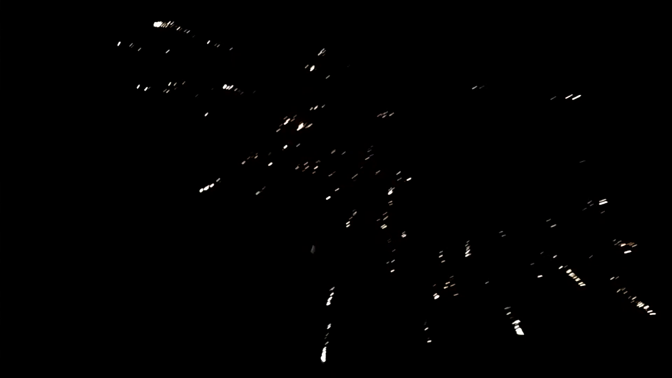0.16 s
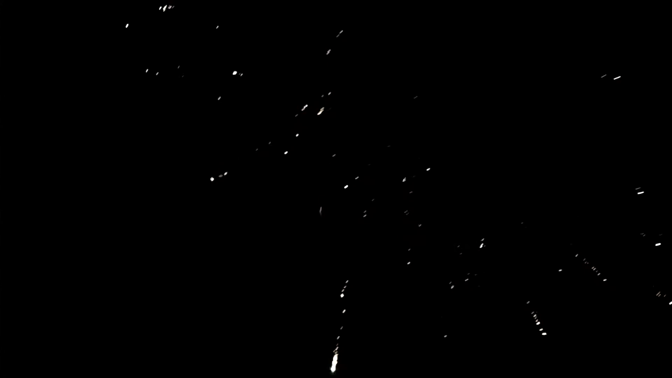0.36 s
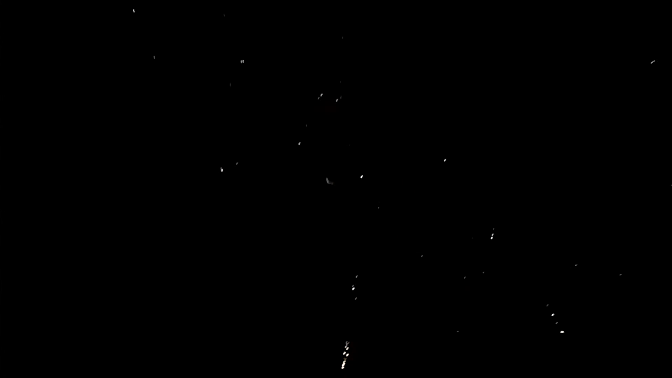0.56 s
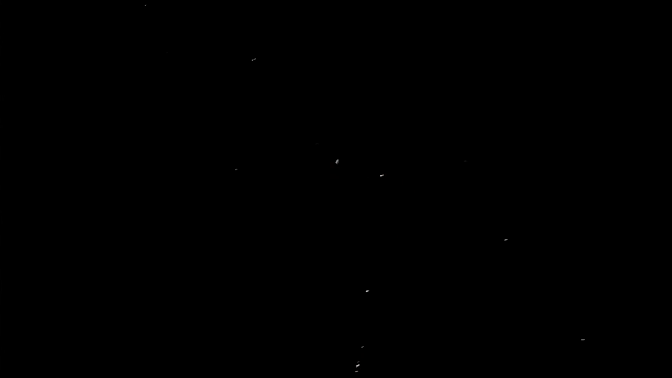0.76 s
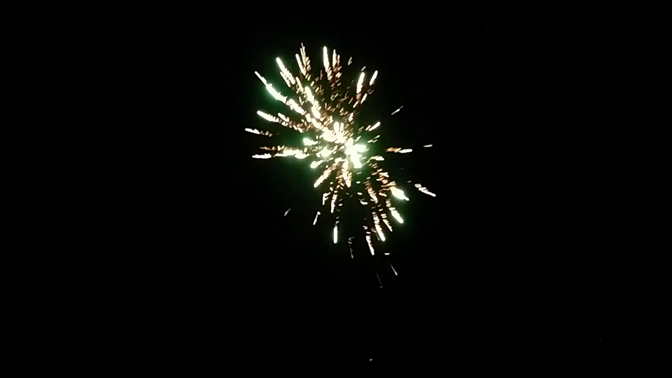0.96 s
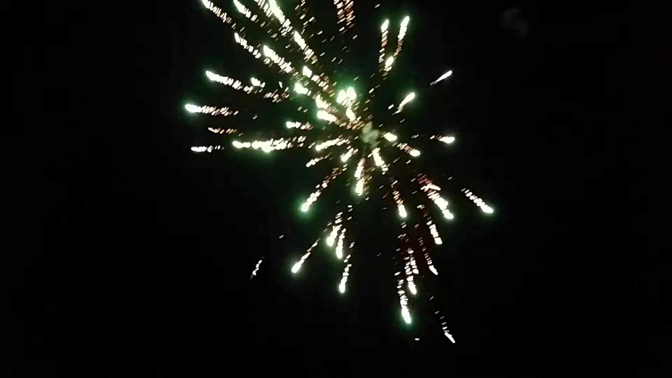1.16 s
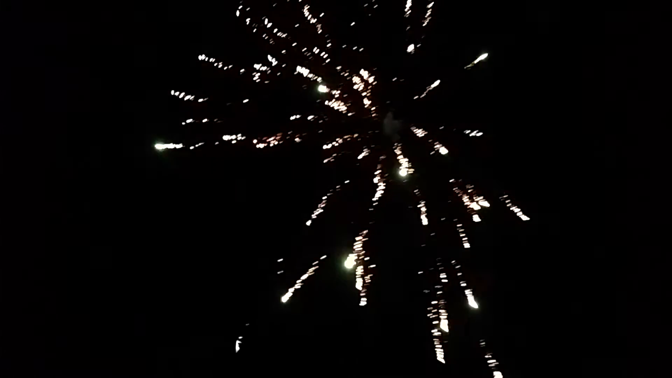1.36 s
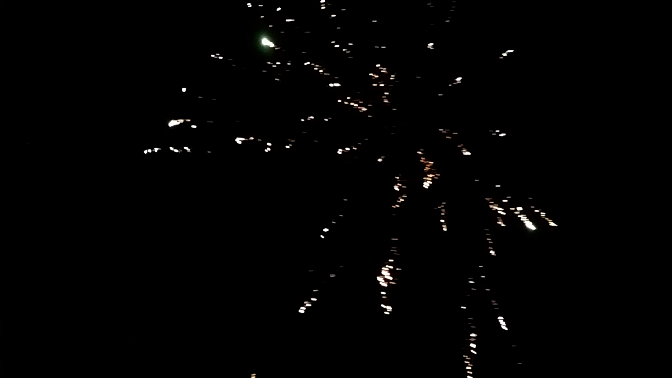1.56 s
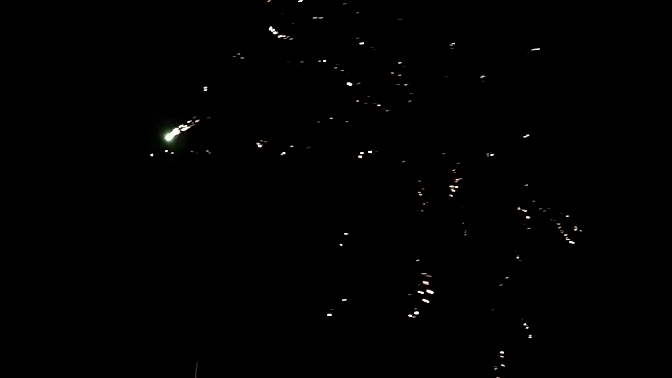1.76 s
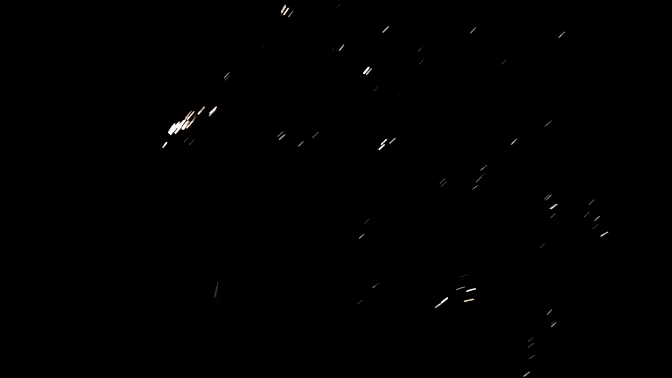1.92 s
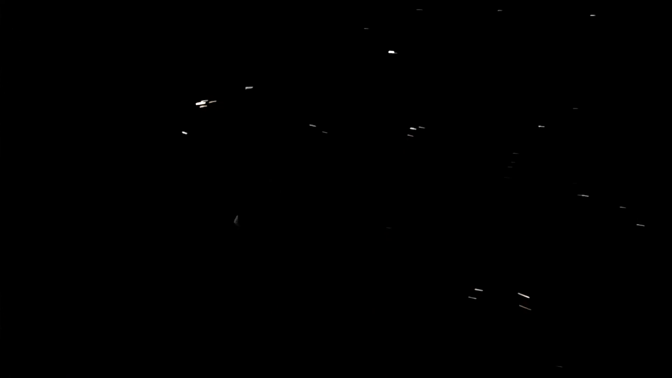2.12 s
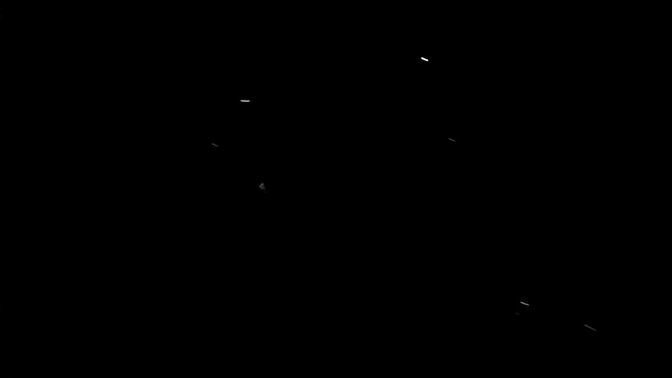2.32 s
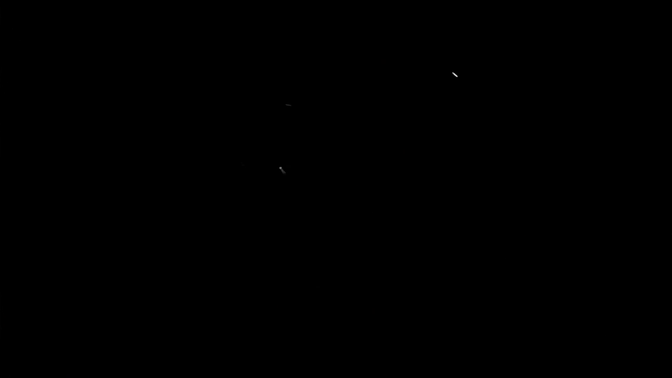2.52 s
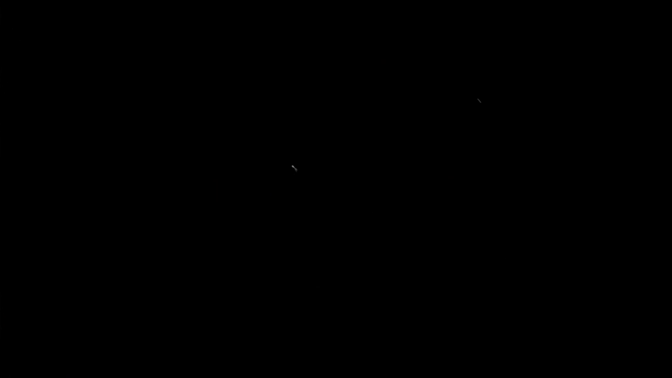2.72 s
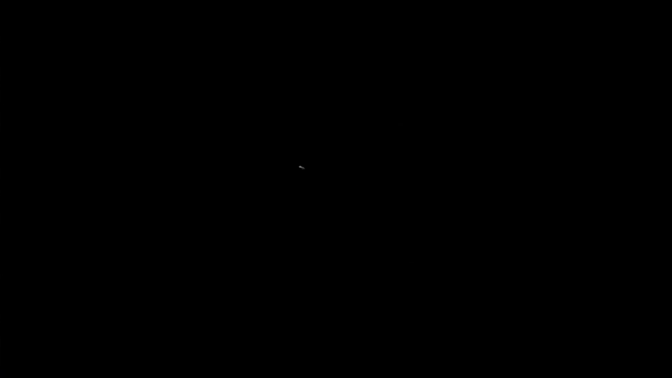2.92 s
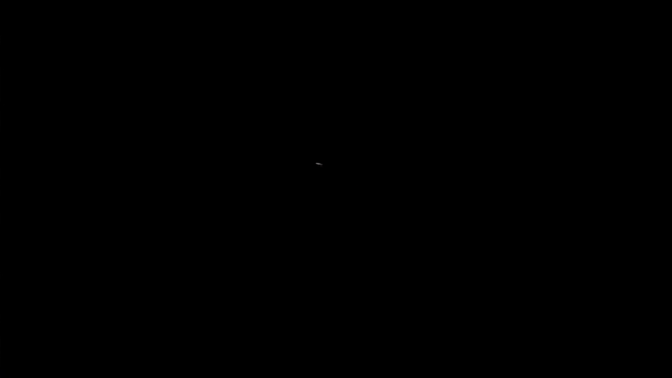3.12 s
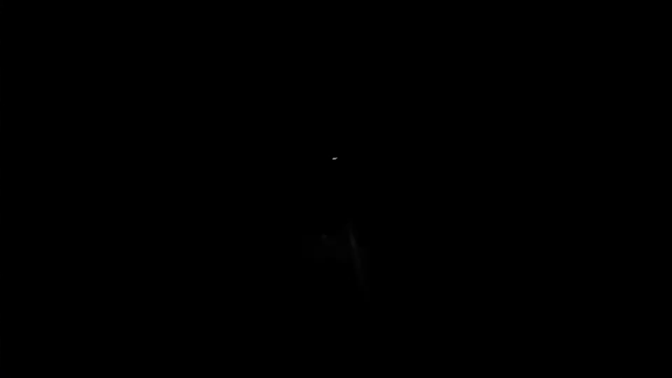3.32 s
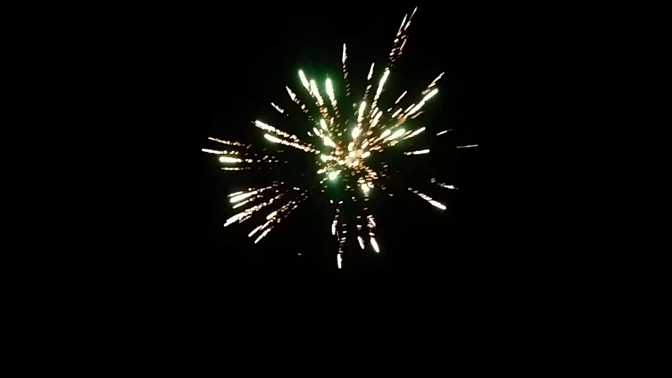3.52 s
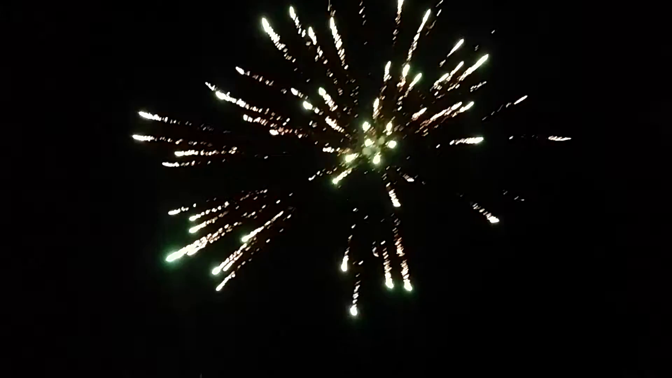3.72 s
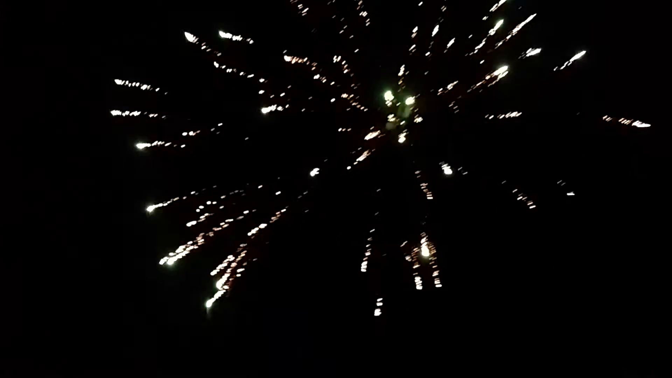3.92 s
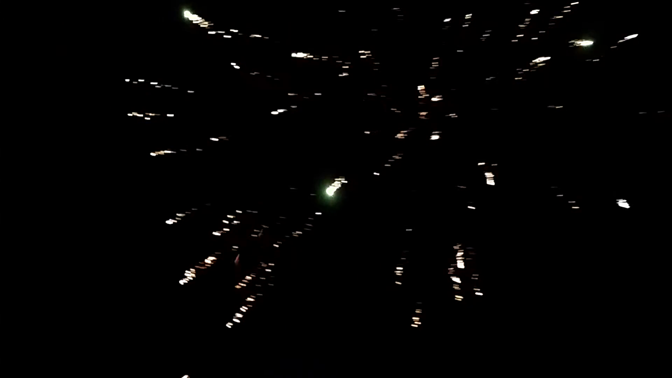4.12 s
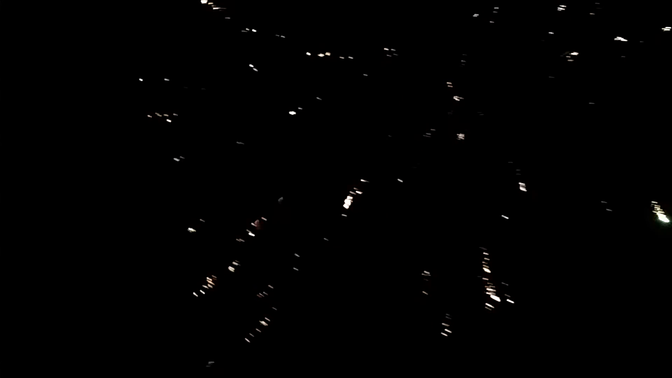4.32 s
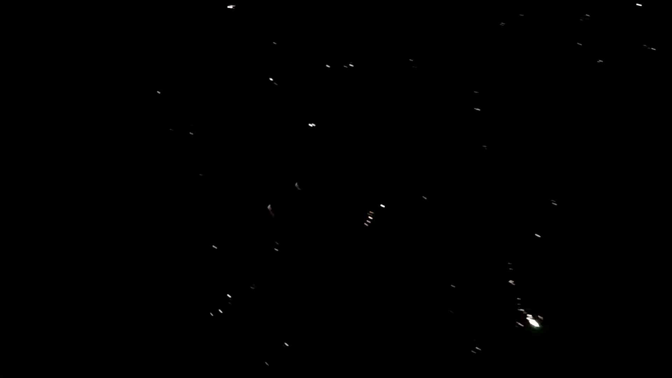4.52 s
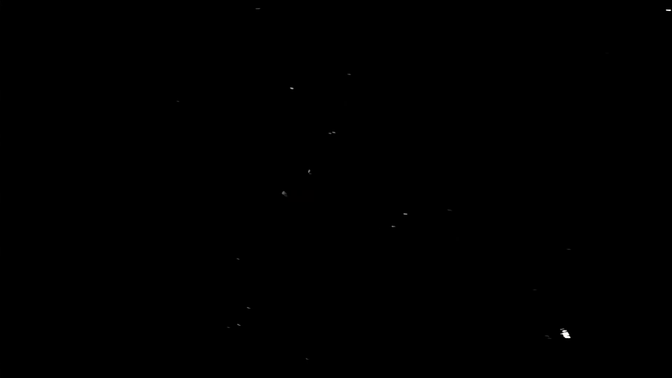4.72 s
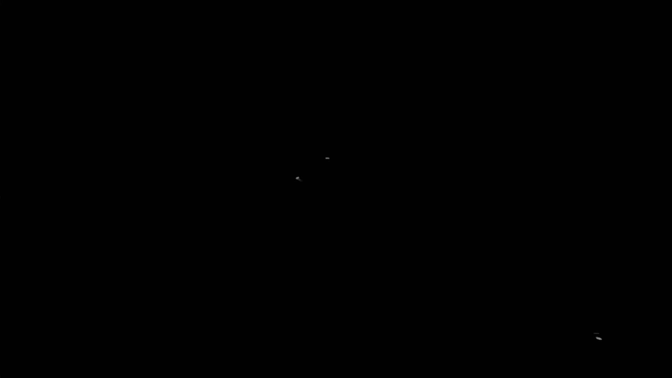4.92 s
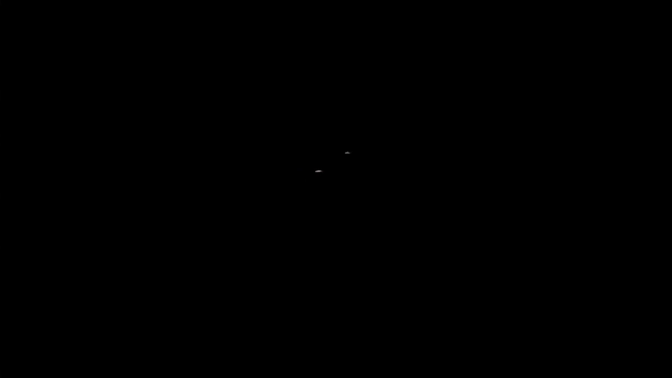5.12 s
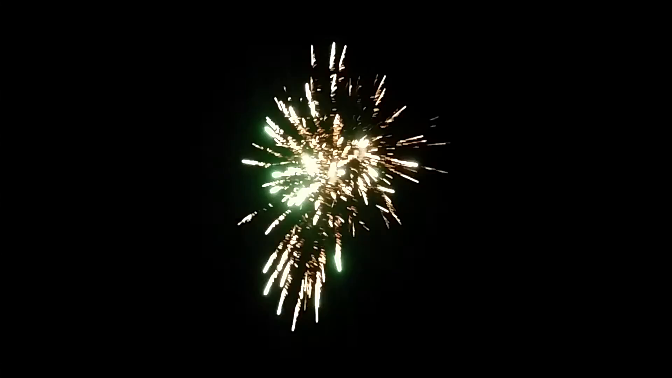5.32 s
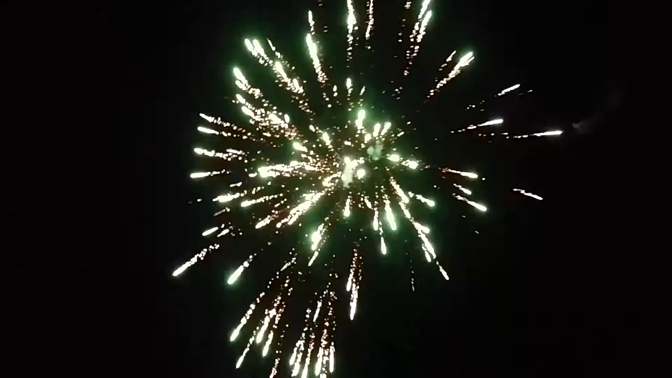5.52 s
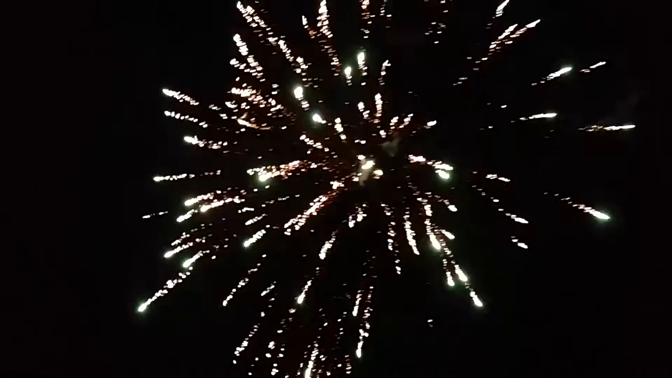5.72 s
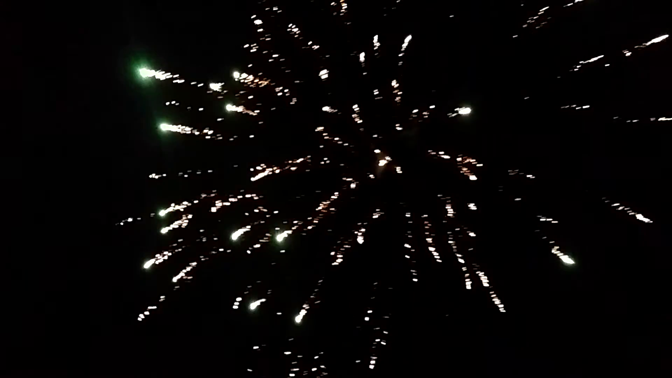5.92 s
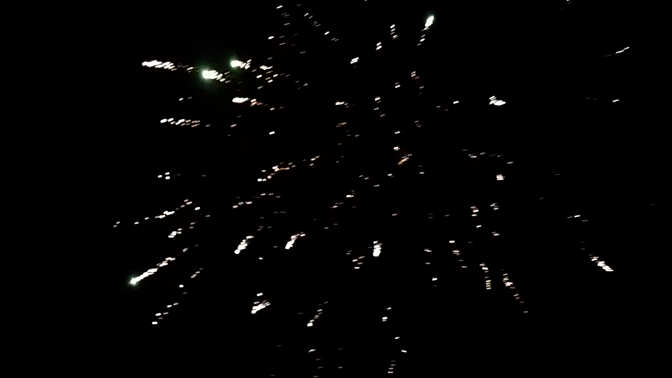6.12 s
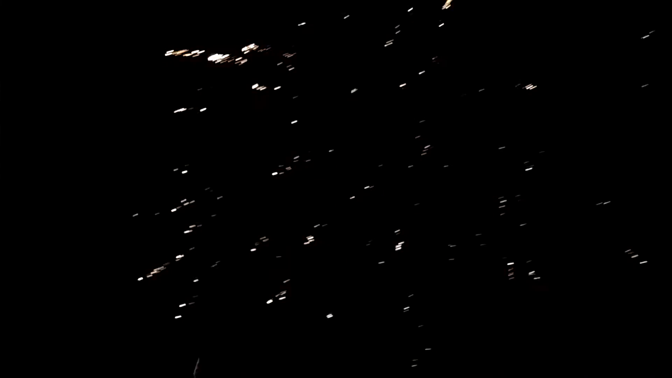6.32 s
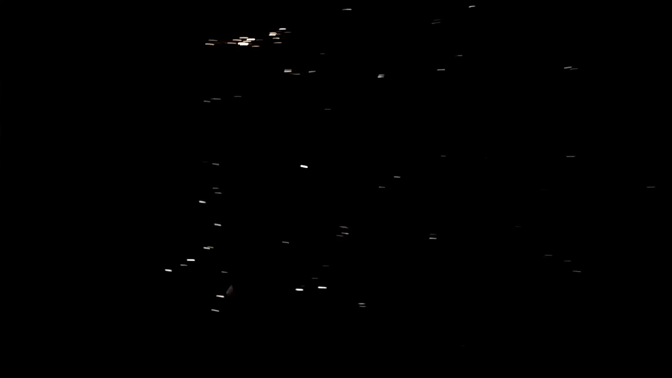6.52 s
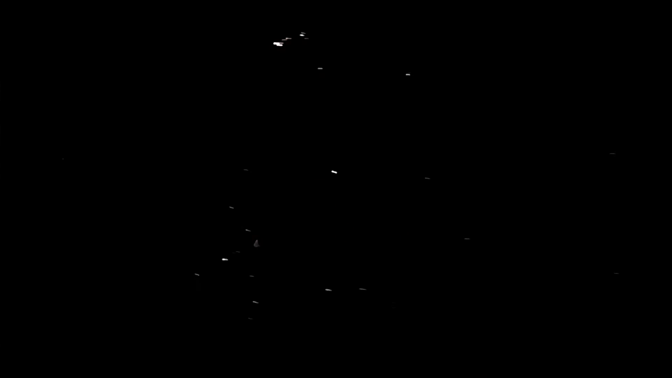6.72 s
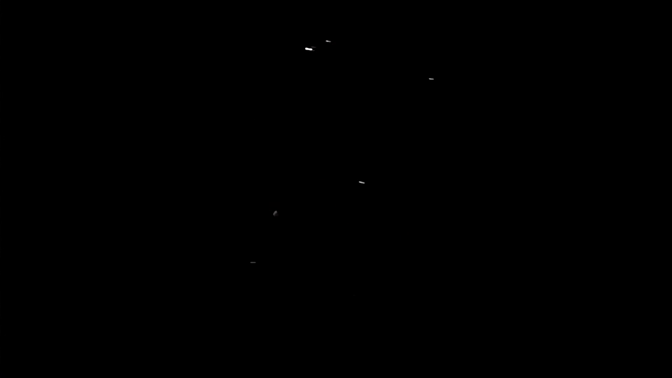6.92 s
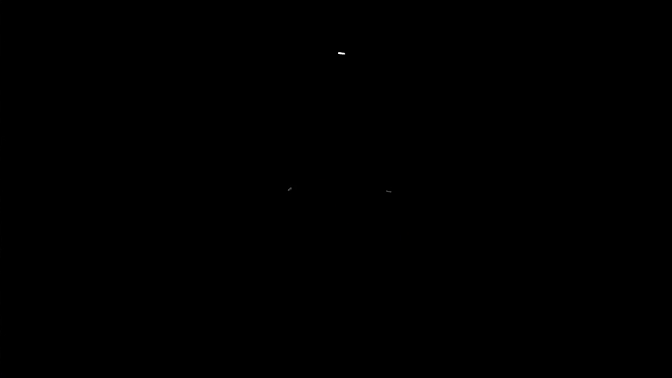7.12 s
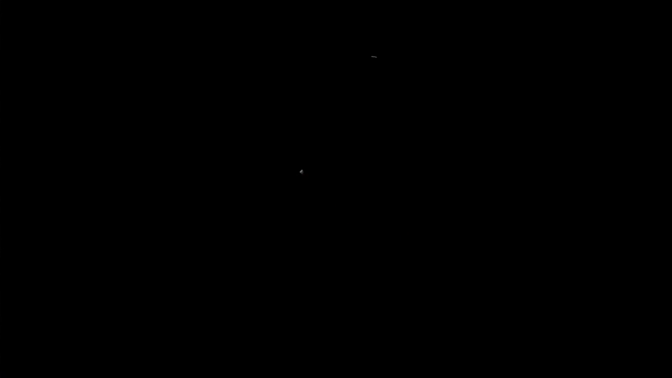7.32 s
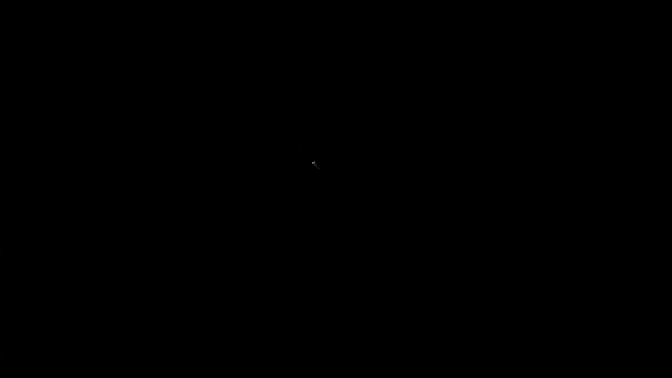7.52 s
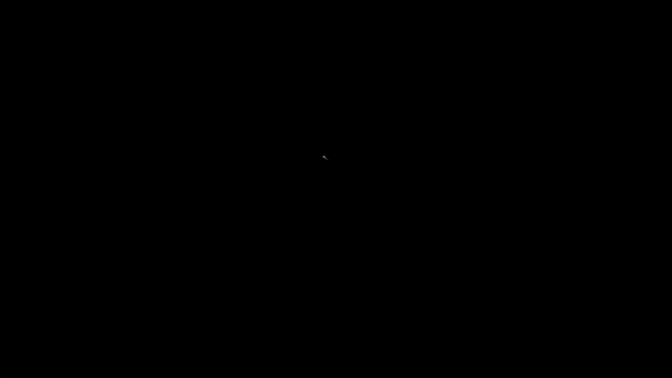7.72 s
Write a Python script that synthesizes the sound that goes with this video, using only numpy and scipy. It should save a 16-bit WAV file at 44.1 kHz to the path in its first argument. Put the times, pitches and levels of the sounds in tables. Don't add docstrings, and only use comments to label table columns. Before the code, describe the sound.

Firework shells crack sharply overhead at night, tubes thump between them, echoes scatter off houses, and wind buffets the phone's microphones.

```python
import sys
import numpy as np
from scipy import signal
from scipy.fft import rfft, irfft, next_fast_len
from scipy.io import wavfile
from scipy.ndimage import uniform_filter1d

SR = 44100
rng = np.random.default_rng(int(sys.argv[2]) if len(sys.argv) > 2 else 0)


def store_wav(level_fs):
    pcm = np.round(np.clip(np.atleast_2d(level_fs), -1, 1) * 32767)
    wavfile.write(sys.argv[1], SR, pcm.T.astype(np.int16))


def ratio(d):
    e = np.asarray(d, float) / 20
    return 10 ** e


N = 342216
TIME = np.arange(N) / SR
BANDS_HZ = 30 * 2 ** np.arange(0, 9.2, 1 / 3)

# (time [s], blast [dB], boom and close reflections [dB], ground echo [dB], tail [dB])
BURSTS = [
    (1.0083, 14, 1, 2, -7.5),
    (3.5655, 15.5, 1, 4, -12),
    (5.3725, 15, -0.5, 2.5, -11),
    (5.4449, 15.5, -6, 1.5, -8.5),
]
LIFTS = [
    (1.3758, 15, -5, -8.5, -17.5),
    (3.3167, 7, -2, -9.5, -19.5),
    (3.3783, 9.4, -0.5, -14.5, -14.5),
    (5.8504, 12.9, -1.5, -14, -19),
]
# (ring [Hz], ring
# [dB], crack [dB])
BURST_VOICES = [(8200, 3.5, -8), (8300, -1, -14), (8300, 1.5, -7.5), (8264, -1.5, -7.5)]
TUBE_VOICES = [(4400, -17, -25), (4700, -20, -14), (5480, -20, -15.5), (5400, -14, -15.5)]
# (time [s], level [dB])
CLIMBS = [(1.414, -54.5), (3.325, -59), (3.385, -50.5), (5.3, -52), (3.7, -58)]
# (frequency [Hz], density [dB per Hz])
CLIMB_SPECTRUM = [(200, -60), (2500, -7), (4500, 0), (9000, 0.5), (13000, -4), (15500, -9)]

# (frequency [Hz], density [dB per Hz])
BURST_SCATTER = [(24, -48), (40, -16), (204, 1), (500, -0.5), (1150, -13.5), (2300, -15), (3300, -21.5),
                 (4700, -21.5), (8550, -32), (14500, -30.5), (16000, -54)]
LIFT_SCATTER = [(60, -20), (300, 6), (700, -2.5), (1500, -10.5), (3000, -25), (6000, -38.5), (14000, -39)]
# (frequency [Hz], near t60 [s], far t60 [s], far share [dB])
SCATTER_DECAY = [(60, 0.38, 0.52, -28.5), (270, 0.17, 0.87, -8.5), (1000, 0.49, 1.2, -11.5),
                 (2280, .6, 1.6, -10), (3880, 0.74, 1.6, -14), (8000, 0.21, 0.88, -10),
                 (13600, 0.061, 0.29, -1)]
# (frequency [Hz], level against the scatter [dB])
FRONTS_SPECTRUM = [(150, -10), (600, -3), (2200, 4), (5000, -7)]
FRONTS_LATE_S, FRONTS_T60_S = 0.021, 0.2
# (delay [s], level against the house fronts [dB])
FAR_WALLS = [(.07, -12.5), (.105, -13), (0.129, -13), (0.161, -15.5), (.2, -13.5), (0.271, -20)]
FAR_WALL_T60_S = 0.087

# (time [s], level [dB], length [ms])
EDDIES_LEFT = [(.207, -30.5, 22), (.496, -18.5, 43), (.619, -18, 27), (.648, -19, 37), (1.566, -28.5, 170),
               (1.905, -23, 31), (2.062, -23.5, 5.4), (2.316, -30, 12.2), (2.43, -29.5, 26),
               (2.538, -23, 15), (3.04, -19, 52), (3.234, -15.5, 33), (3.282, -19, 2.8), (3.517, -21.5, 22),
               (3.843, -16, 51), (3.971, -11, 27), (4.012, -18, 11), (4.041, -22, 53), (4.262, -5, 29),
               (4.812, -16.5, 49), (4.845, -13, 26), (4.987, -13.5, 14), (5.054, -15.5, 50),
               (5.103, -18, 19), (5.146, -17, 40), (5.283, -19.5, 15), (5.341, -16, 7.7), (6.013, -22, 30),
               (6.134, -23, 23), (6.226, -20, 17)]
EDDIES_RIGHT = [(.46, -24, 5.7), (.652, -33, 13), (.872, -15, 39), (.947, -31, 5.4), (1.909, -27, 66),
                (2.391, -31, 17), (2.495, -33.5, 14), (2.536, -21.5, 10), (2.65, -29, 30), (2.813, -32, 19),
                (3.169, -35, 13), (3.272, -24, 58), (3.435, -19.5, 32), (3.875, -26, 28),
                (3.921, -16.5, 28), (3.957, -29, 29), (4.182, -27, 18), (4.408, -14, 13), (4.436, -17, 13),
                (4.565, -22, 28), (4.606, -12.5, 91), (4.678, -13, 29), (4.938, -29, 44), (5.268, -31, 80),
                (6.533, -35.5, 17), (.599, -41, 14), (6.2, -30, 40), (2.03, -41, 30)]
# (time [s], snap peak [dB], eddy [dB], length [ms])
TORN_EDDIES = [(1.824, -43, -12.5, 11.7), (1.868, -42, -13, 14.3), (2.184, -45, -12.5, 21.8),
               (2.222, -41.5, -18, 7.3), (3.19, -22, -16, 18), (3.868, -29.5, -25, 45),
               (4.164, -35.5, -14, 12.3), (4.208, -36.5, -8, 49), (4.329, -32.5, -16, 5.2),
               (4.568, -34, -8.5, 22), (4.612, -36, -8.5, 30.4), (4.78, -29, -15.5, 8.3),
               (4.872, -35, -17, 23.6), (5.311, -20.5, -10, 13.2)]
# (time [s], left [dB], right [dB])
BREEZE = [(0, -33, -53), (.25, -51.5, -55), (1.499, -53, -53), (2.3, -43, -58), (2.8, -57.5, -55),
          (3.1, -33, -34), (3.8, -25.5, -40.5), (4.4, -35.5, -44), (5, -32.5, -44), (5.6, -30.5, -38),
          (6.2, -35.5, -47.5), (6.5, -63.5, -81.5), (7.76, -74, -58)]
# (time [s], peak [dB], centre [Hz], left minus right [dB])
TICKS = [(3.955, -28, 910, 28), (3.955, -34.5, 1800, 20), (4.254, -44, 1200, 22), (4.264, -43, 1200, 22),
         (4.8, -42, 810, 22), (6.226, -45, 510, 18), (4.676, -36, 510, -34.5)]
KICKS_EARLY = [(0.436, -43, 143, 17), (0.462, -28.5, 159, 22.0), (0.536, -33, 223, 17),
               (0.611, -29, 143, 29.0), (0.612, -24, 169, 24.5), (0.853, -28, 143, -32.5),
               (0.852, -18, 143, -28), (0.94, -37, 148, -16)]
KICKS_SECOND = [(1.56, -44, 140, 8.5), (1.821, -25.5, 240, 25), (1.866, -23.5, 144, 28),
                (2.006, -49, 143, 8.0), (2.055, -46.5, 143, 18.5), (2.187, -48, 320, 24.5),
                (2.188, -36, 143, 29.0), (2.219, -32.5, 168, 25.0), (2.31, -42, 148, 11),
                (2.51, -37, 205, 16.0), (2.52, -22, 164, 11), (2.585, -44, 191, 1.5), (2.633, -32, 159, 3),
                (3.024, -25, 175, 19.5), (3.068, -20, 149, 17), (3.152, -32, 145, 3), (3.189, -15, 140, 21),
                (3.26, -32, 218, 10)]
KICKS_THIRD = [(3.821, -23.5, 266, 15), (3.955, -26.5, 175, 21), (4.037, -27, 156, 22.5),
               (4.162, -19.5, 161, 21.5), (4.22, -23, 237, 28.0), (4.251, -38, 175, 29.5),
               (4.324, -26, 272, 23), (4.391, -29, 143, -6.0), (4.429, -32, 143, -16), (4.503, -32, 161, 7),
               (4.567, -26, 240, 1), (4.669, -24, 143, -2), (4.777, -39, 143, 24.0), (4.839, -14, 170, 26),
               (4.975, -20.5, 143, 20.5), (4.98, -18.5, 178, 28), (5.043, -17, 178, 26.0),
               (5.131, -20, 164, 25.5), (5.17, -17, 167, 22.0), (5.277, -18, 250, 19),
               (5.309, -14, 218, 34)]
KICKS_LATE = [(5.944, -41, 213, 7.0), (5.985, -39, 183, 17), (6.094, -50.5, 151, 9.7),
              (6.126, -41, 186, 16.0), (6.179, -37.5, 167, 15.5), (6.218, -41, 171, 18),
              (6.279, -40, 202, 11)]
KICK_DB = -8
SNAP_HZ, SNAP_PAN_DB, SNAP_LEAD = 445, 34, 0.4
SNAP_EDGE_HZ, SNAP_EDGE_DB = 840, -10
LEFT_EDDY_HZ, RIGHT_EDDY_HZ, TORN_EDDY_HZ = 140, 116, 157
HZ_PER_LENGTH, HZ_SCATTER = -0.03, 0.091
FLUTTER_DB, TORN_FLUTTER_DB = -19, -10.5
SMALL_EDDIES, SMALL_OVER_BREEZE_DB, SMALL_SCATTER_DB, SMALL_MS = 70, 8, 3.5, 21

# (frequency [Hz], density [dB per Hz])
TOWN_SPECTRUM = [(20, -40.5), (35, -13.5), (75, 0.5), (150, -10), (200, -10), (430, -12), (540, -11.5),
                 (680, -10), (1040, -20.5), (2200, -17), (3300, -36), (4800, -36.5), (7000, -47),
                 (15500, -46)]
TOWN_DB = -43.5
# (time [s], level [dB])
TRAFFIC = [(0, -2.5), (.8, 0.5), (2.6, -4.5), (4.6, 0.5), (5.2, -1), (6.8, -0.5), (7.2, -1.5), (7.76, -3.5)]
# (frequency [Hz], common share [0-1])
LIKENESS = [(60, 1), (300, .9), (700, 0.8), (1100, 0.086), (2000, 0.99), (3200, 0.054), (8000, 0.2)]
# (frequency [Hz], level against the right port [dB])
LEFT_PORT = [(60, 0.5), (700, -3.5), (2400, -4.5), (4400, 0), (8200, 7), (15000, 1.5)]
PORT_LAG = 5
AIR_EDGE = signal.ellip(8, .2, 45, 15500, fs=SR, output="sos")

OPEN_DB, DUCK_DB, RELEASE_S, RELEASE_BEND = 1.89, -14, 0.37, 2.2
BURST_ATTACK_S, BURST_HOLD_S = 0.052, 0.98
LIFT_ATTACK_S, LIFT_HOLD_S = 0.11, 0.72
EARLIER_BANG_S = -0.71


def scene():
    air = bursts() + lifts() + signal.sosfilt(AIR_EDGE, surroundings())
    hz = np.maximum(np.arange(N // 2 + 1) * SR / N, 1)
    air[0] = irfft(rfft(air[0]) * ratio(on_log(hz, LEFT_PORT)), N)
    return air + gusts() + snaps() / ratio(gain_db())


def bursts():
    return bangs(BURSTS, BURST_VOICES, echo_ms=8.6, front=(.33, .52, 3.4), boom=(105.5, -13.5, 4.0, 0.47),
                 ring_ms=0.087, right_db=(-24, -4), crack_ms=0.77, ground_hz=2600,
                 clatter=(1.5, 22, 450), width=2)


def lifts():
    return bangs(LIFTS, TUBE_VOICES, echo_ms=0.94, front=(.42, .62, 2.1), boom=(198, -1.5, 2.0, -0.47),
                 ring_ms=0.84, right_db=(-7, -4), crack_ms=0.76, ground_hz=2000,
                 clatter=(-17, 7.3, 400), width=11)


def bangs(shots, voices, echo_ms, front, boom, ring_ms, right_db, crack_ms, ground_hz, clatter, width):
    out, age = np.zeros((2, N)), np.arange(400) / SR
    clatter_db, clatter_ms, clatter_hz = clatter
    boom_hz, boom_db, boom_ms, boom_turn = boom
    smear = np.ones(width) / width
    ground = signal.butter(1, ground_hz, fs=SR, output="sos")
    thin = signal.butter(2, clatter_hz, "highpass", fs=SR, output="sos")
    ragged = signal.butter(2, [3200, 12500], "bandpass", fs=SR, output="sos")
    for (s, db, body_db, echo_db, _), (ring_hz, ring_db, crack_db) in zip(shots, voices):
        ring = np.sin(2 * np.pi * ring_hz * age) * np.exp(-age / (ring_ms / 1000))
        for port in range(2):
            paths = np.zeros(1500)
            near = (40 + rng.random(24) * clatter_ms * SR / 1000).astype(int)
            fade = np.exp(-near / (0.22 * clatter_ms * SR / 1000))
            paths[near] = ratio(clatter_db + body_db) * rng.uniform(-1.9, 1, 24) * fade
            paths = signal.sosfilt(thin, paths)
            paths[int(echo_ms * SR / 1000)] += ratio(echo_db)
            paths = signal.sosfilt(ground, paths)
            paths[0] += 1
            port_boom_db = boom_db + body_db - 3 * (1 - port)
            source = blast(*front, boom_hz, port_boom_db, boom_ms, boom_turn)
            wave = np.convolve(smear, np.convolve(paths, source))
            crack = signal.sosfilt(ragged, rng.standard_normal(400)) * np.exp(-age / (crack_ms / 1000))
            wave[:400] += ratio(ring_db + right_db[0] * port) * ring
            wave[:400] += ratio(crack_db + right_db[1] * port) * crack
            at = int(s * SR) + port * PORT_LAG // 2
            out[port, at:at + len(wave)] += ratio(db) * wave
    return out


def blast(phase_ms, bend, swings, boom_hz, boom_db, boom_ms, boom_turn):
    age = np.arange(1800) / SR
    u = age / (phase_ms / 1000)
    shock = np.sin(np.pi * u ** bend) * np.exp(-u / swings)
    boom = np.sin(2 * np.pi * (boom_hz * age + boom_turn)) * np.exp(-age / (boom_ms / 1000))
    return shock + ratio(boom_db) * boom * (1 - np.exp(-u))


def surroundings():
    walls = walk(45)
    swell = 1.2 * walk(1.8) + np.interp(TIME, *np.transpose(TRAFFIC))
    fronts = wall_echoes()
    climbs = fading(CLIMBS, 1.8, 0.04)
    out = 0
    for hz, noise in diffuse_bands():
        patches = ratio(3 * walls + 3 * walk(25))
        power = scatter(hz, fronts) * patches
        power += climbs * share(hz, CLIMB_SPECTRUM)
        power += ratio(2 * (TOWN_DB + swell + walk(6))) * share(hz, TOWN_SPECTRUM)
        out = out + noise * np.sqrt(power)
    return out


def scatter(hz, fronts):
    near_t60, far_t60, far_db = (on_log(hz, SCATTER_DECAY, column=c) for c in (1, 2, 3))
    burst = fading(BURSTS, near_t60, 0.023) + ratio(2 * far_db) * fading(BURSTS, far_t60, 0.032)
    burst += ratio(2 * on_log(hz, FRONTS_SPECTRUM)) * fronts
    lift = fading(LIFTS, 0.25 * near_t60, 0.0011)
    lift += ratio(2 * (far_db + 1.5)) * fading(LIFTS, 0.26 * far_t60, 0.0076)
    return burst * share(hz, BURST_SCATTER) + lift * share(hz, LIFT_SCATTER)


def wall_echoes():
    near = [(s + FRONTS_LATE_S, tail_db) for s, *_, tail_db in BURSTS]
    far = [(s + late_s, tail_db + db) for s, *_, tail_db in BURSTS for late_s, db in FAR_WALLS]
    return fading(near, FRONTS_T60_S, 0.0062) + fading(far, FAR_WALL_T60_S, 0.0025)


def fading(shots, t60, build_s):
    power, age = np.zeros(N + 2 * SR), TIME[:2 * SR]
    shape = (1 - np.exp(-age / build_s)) * np.exp(-2 * np.log(1000) * age / t60)
    for s, *_, tail_db in shots:
        at = int(s * SR)
        power[at:at + 2 * SR] += ratio(2 * tail_db) * shape
    return power[:N]


def diffuse_bands():
    size = next_fast_len(N)
    hz = np.maximum(np.arange(size // 2 + 1) * SR / size, 1)
    common, own = rfft(rng.standard_normal((2, size)))
    like = np.clip(on_log(hz, LIKENESS), 0, 1)
    early = common * np.exp(2j * np.pi * hz * PORT_LAG / SR)
    left = like * early + np.sqrt(1 - like ** 2) * own
    for centre in BANDS_HZ:
        window = np.cos(np.pi / 2 * np.clip(3 * np.log2(hz / centre), -1, 1))
        yield centre, irfft(np.array([left, common]) * window, size)[:, :N]


def share(hz, spectrum):
    band_power = ratio(2 * on_log(BANDS_HZ, spectrum)) * BANDS_HZ
    total = np.sum(band_power) * np.log(2) / 3 / (SR / 2)
    return ratio(2 * on_log(hz, spectrum)) / total


def gusts():
    s, left_db, right_db = np.transpose(BREEZE)
    left_db, right_db = np.interp(TIME, s, left_db), np.interp(TIME, s, right_db)
    torn = [(s + SNAP_LEAD * ms / 1000, db, ms) for s, _, db, ms in TORN_EDDIES]
    left = shed(EDDIES_LEFT, LEFT_EDDY_HZ, FLUTTER_DB) + shed(torn, TORN_EDDY_HZ, TORN_FLUTTER_DB)
    left += shed(small_eddies(left_db), LEFT_EDDY_HZ, FLUTTER_DB)
    right = shed(EDDIES_RIGHT, RIGHT_EDDY_HZ, FLUTTER_DB)
    right += shed(small_eddies(right_db), RIGHT_EDDY_HZ, FLUTTER_DB)
    return np.array([wind(left, left_db), wind(right, right_db)])


def wind(eddies, breeze_db):
    rumble = signal.butter(2, [55, 150], "bandpass", fs=SR, output="sos")
    out = unit(signal.sosfilt(rumble, rng.standard_normal(N))) * ratio(breeze_db + 2.5 * walk(20))
    flutter = signal.butter(3, [320, 850], "bandpass", fs=SR, output="sos")
    span = np.arange(-3000, 3000)
    age = span / SR
    for (s, db, ms, hz, flutter_db), noise in zip(eddies, rng.standard_normal((len(eddies), 6000))):
        band = signal.butter(2, [.45 * hz, 1.77 * hz], "bandpass", fs=SR, output="sos")
        smooth = signal.butter(2, 2.7 * hz, fs=SR, output="sos")
        wobble = signal.sosfilt(smooth, np.tanh(unit(signal.sosfilt(band, noise))))
        swing = np.cos(2 * np.pi * hz * age) * np.exp(-(age * hz / 0.43) ** 2)
        puff = (.7 * unit(wobble) + 1.6 * swing) * np.exp(-(age / (0.65 * ms / 1000)) ** 2)
        centre_power = np.sum(np.hanning(900) * puff[2550:3450] ** 2)
        puff *= np.sqrt(np.sum(np.hanning(900)) / centre_power / 2)
        bright = unit(signal.sosfilt(flutter, noise)) * np.exp(-(age / (0.2 * ms / 1000)) ** 2)
        eddy = ratio(db) * (puff + ratio(flutter_db - 7.5) * bright)
        where = int(s * SR) + span
        inside = (where >= 0) & (where < N)
        out[where[inside]] += eddy[inside]
    return out


def shed(rows, hz, flutter_db):
    s, db, ms = np.transpose(rows)
    chance = rng.standard_normal((len(s), 2)).T
    swing_hz = hz * (ms / 20) ** HZ_PER_LENGTH * np.exp(HZ_SCATTER * chance[0])
    return list(zip(s, db, ms, swing_hz, flutter_db + 1.7 * chance[1]))


def small_eddies(breeze_db):
    chance = rng.standard_normal((SMALL_EDDIES, 3)).T
    place = (np.arange(SMALL_EDDIES) + .5 + .3 * chance[0]) / SMALL_EDDIES
    at = np.clip(place * N, 0, N - 1).astype(int)
    db = breeze_db[at] + SMALL_OVER_BREEZE_DB + SMALL_SCATTER_DB * chance[1]
    return np.transpose([TIME[at], db, SMALL_MS * np.exp(0.37 * chance[2])])


def snaps():
    out, age = np.zeros((2, N)), np.arange(-450, 450) / SR
    clicks = [(s, db, SNAP_HZ, SNAP_PAN_DB) for s, db, *_ in TORN_EDDIES]
    clicks += [(s, db + SNAP_EDGE_DB, SNAP_EDGE_HZ, SNAP_PAN_DB) for s, db, *_ in TORN_EDDIES]
    kicks = KICKS_EARLY + KICKS_SECOND + KICKS_THIRD + KICKS_LATE
    clicks += TICKS + [(s + .4 / hz, db + KICK_DB, hz, pan_db) for s, db, hz, pan_db in kicks]
    for s, db, hz, pan_db in clicks:
        click = np.sin(2 * np.pi * hz * age) * np.exp(-np.abs(age * hz / 0.59) ** 1.6)
        lean = ratio(np.minimum([pan_db, -pan_db], 0))
        at = int(s * SR) - 380
        out[:, at:at + 900] += ratio(db + 8) * np.outer(lean, click)
    return out


def on_log(hz, table, column=1):
    rows = np.array(table)
    return np.interp(np.log(hz), np.log(rows[:, 0]), rows[:, column])


def unit(x):
    return x / np.sqrt(np.mean(x ** 2))


def walk(rate_hz):
    k = int(SR / rate_hz)
    steps = np.repeat(rng.standard_normal(N // k + 1), k)
    return 0.75 * uniform_filter1d(uniform_filter1d(steps, k), k)[:N]


def gain_db():
    clock = TIME[::32]
    duck = np.zeros(len(clock))
    ducks = [(s, BURST_ATTACK_S, BURST_HOLD_S) for s in [row[0] for row in BURSTS] + [EARLIER_BANG_S]]
    ducks += [(row[0], LIFT_ATTACK_S, LIFT_HOLD_S) for row in LIFTS]
    for s, attack_s, hold_s in ducks:
        age = np.maximum(clock - s, 0)
        back = np.exp(-(np.maximum(age - hold_s, 0) / RELEASE_S) ** RELEASE_BEND)
        duck = np.maximum(duck, (1 - np.exp(-age / attack_s)) * back)
    return OPEN_DB + DUCK_DB * np.interp(TIME, clock, duck)


def roll_off(x):
    return signal.sosfilt(signal.butter(12, 16510, fs=SR, output="sos"), x)


def record(dry):
    hiss = signal.sosfilt(AIR_EDGE, rng.standard_normal(dry.shape))
    hiss_band = signal.butter(2, [2600, 5800], "bandpass", fs=SR, output="sos")
    hiss = ratio(-87.0) * hiss
    hiss = hiss + ratio(-76.5) * signal.sosfilt(hiss_band, hiss / ratio(-87.0) * ratio(-87.0) ** 0)
    x = np.clip(dry * ratio(gain_db()) + hiss, -.92, .92)
    x = signal.sosfilt(signal.butter(1, 25, "highpass", fs=SR, output="sos"), x)
    x = signal.sosfilt(signal.cheby2(12, 40, 16800, fs=SR, output="sos"), x)
    return roll_off(np.clip(x, -1, 1))


dry = scene()
out = record(dry)
store_wav(out)
```